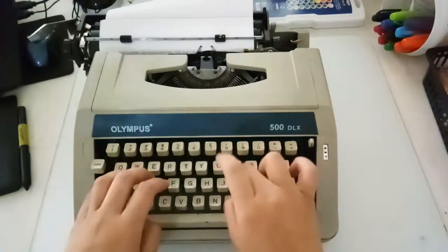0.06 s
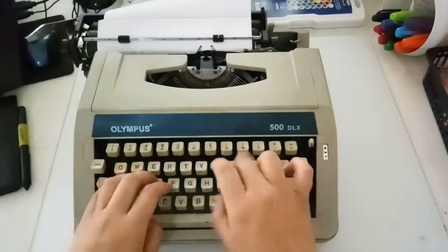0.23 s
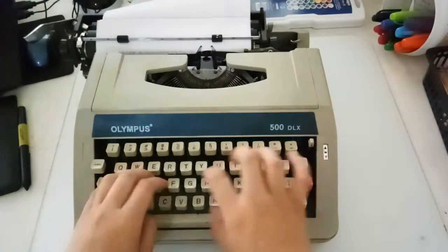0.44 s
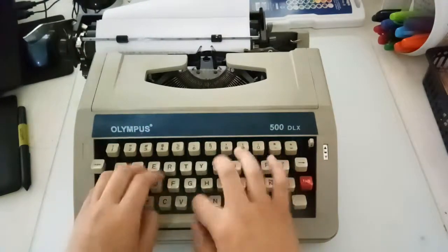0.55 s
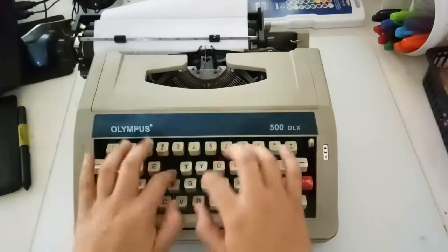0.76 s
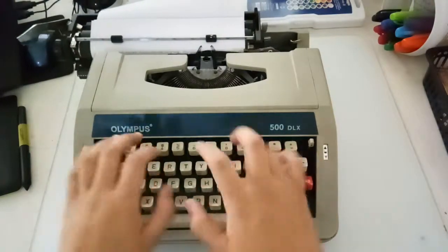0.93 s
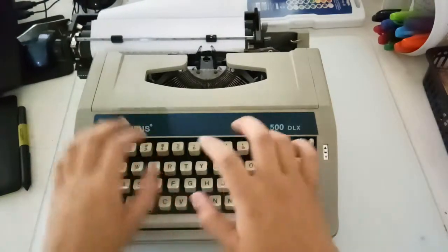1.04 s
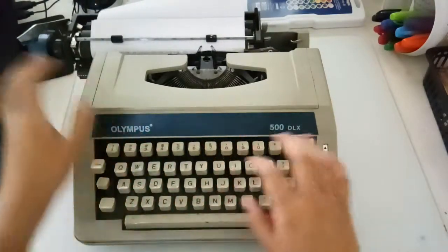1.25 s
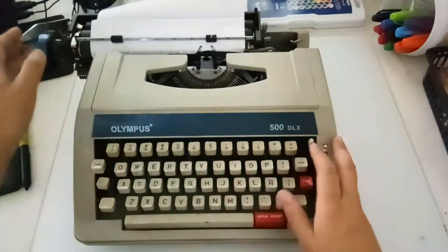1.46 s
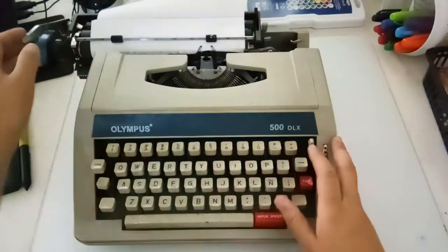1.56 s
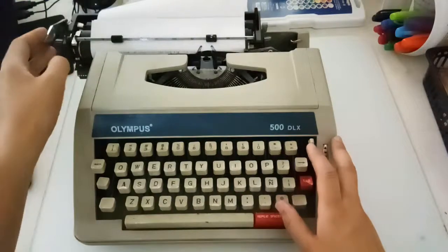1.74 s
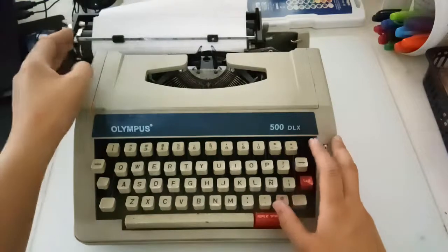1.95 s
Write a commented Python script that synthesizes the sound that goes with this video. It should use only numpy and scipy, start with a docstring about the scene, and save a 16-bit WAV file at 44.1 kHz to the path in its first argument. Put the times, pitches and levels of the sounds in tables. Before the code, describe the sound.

A typewriter clacks quickly, its bell dings, then the carriage lever clicks softly.

```python
"""Type bars slap the platen of a portable typewriter and rattle back, on a desk in a quiet room.
Each impact is a burst of noise plus the damped modes of the parts it excites. The margin bell rings
and beats; the typing stops, and a hand takes up the carriage lever with a few clicks.
A limiter flattens each blow and lets the bell swell back between them."""
import sys
import numpy as np
from scipy import signal
from scipy.fft import rfft, irfft
from scipy.io import wavfile

SR = 44100
rng = np.random.default_rng(int(sys.argv[2]) if len(sys.argv) > 2 else 0)


def persist_wave(psi):
    """Save psi, clipped to +-1, as 16-bit WAV."""
    counts = np.round(np.clip(psi, -1, 1) * 32767).astype(np.int16)
    wavfile.write(sys.argv[1], SR, np.atleast_2d(counts).T)


N = 88200
TIME = np.arange(N) / SR


def amp(db):
    """Amplitude ratio: a factor of ten for every 20 dB."""
    return np.exp(np.maximum(db, -300) * (np.log(10) / 20))


def gains(spectrum, hz):
    """Frequency response: levels interpolated on a log-frequency axis."""
    points_hz, db = np.transpose(spectrum)
    return amp(np.interp(np.log(hz + 1), np.log(points_hz), db))


def unit(x):
    """Normalisation to an rms of 1."""
    return x / np.sqrt(np.mean(x ** 2) + 1e-20)


def noise(spectrum, tilt_db=0):
    """Spectral shaping: white noise is coloured, then tilted by tilt_db per octave about 5 kHz."""
    hz = np.fft.rfftfreq(N, 1 / SR)
    tilt = amp(tilt_db * np.log2(np.maximum(hz, 500) / 5000))
    return unit(irfft(rfft(rng.standard_normal(N)) * gains(spectrum, hz) * tilt, N))


def fade(t60, hold_s=0):
    """Exponential decay: after the hold, the level falls 60 dB every t60 seconds."""
    return amp(-60 * np.maximum(TIME - hold_s, 0) / t60)


def rise(seconds):
    """Linear onset from silence to full amplitude."""
    return np.minimum(TIME / seconds, 1)


def sine(hz):
    """Simple harmonic motion with a random phase."""
    return np.sin(2 * np.pi * (hz * TIME + rng.random()))


def modes(table):
    """Free vibration: a sum of damped sinusoids."""
    return sum(amp(db) * sine(hz) * fade(t60) for hz, db, t60 in table)


def impact(spectrum, tilt_db, hold_s, rise_s, crack_t60, tail_db, tail_t60):
    """Two-stage decay: the crack of many small metal parts and their tail add in power."""
    envelope = np.hypot(fade(crack_t60, hold_s), amp(tail_db) * fade(tail_t60))
    return noise(spectrum, tilt_db) * envelope * rise(rise_s)


def add(mix, start_s, sound):
    """Superposition: a sound joins the mix at its start time."""
    at = round(start_s * SR)
    sound = sound[max(-at, 0):]
    part = mix[max(at, 0):][:len(sound)]
    part += sound[:len(part)]


def split(x, hz):
    """Complementary filtering: the bass below hz, and the rest."""
    bass = signal.sosfiltfilt(signal.butter(3, hz, fs=SR, output="sos"), x, padtype="even")
    return bass, x - bass


# Room noise. Each row: frequency in Hz, relative level in dB.
ROOM_SPECTRUM = [(25, -7), (42, -11), (75, 6.5), (135, 3), (210, -8), (700, -8.5), (1500, -12), (3200, -17),
                 (6300, -18.5), (8300, -28), (10000, -20.5), (15500, -40)]
# An appliance's hum. Each row: frequency in Hz, level in dB.
HUM_TONES = [(135, -63.5), (274.5, -67), (329, -69.5), (711, -70)]
# Drift of the background above the bass. Each row: time in seconds, gain in dB.
ROOM_DRIFT = [(0, 5.5), (1.0, -6.5), (1.17, -9.5), (1.27, -0.5), (1.42, 0), (1.58, 3.5), (1.75, 2.5),
              (2, 2.5)]

def room():
    """Ambient noise: a continuous low rumble under the line spectrum of a faint hum."""
    air = amp(-55) * noise(ROOM_SPECTRUM)
    hum = np.sqrt(2) * sum(amp(db) * sine(hz) for hz, db in HUM_TONES)
    bass, rest = split(air + hum, hz=190)
    return bass + rest * amp(np.interp(TIME, *np.transpose(ROOM_DRIFT)))


# Thuds of the case. Each row: start in seconds, level in dB.
CASE_THUDS = [(-.005, -55), (.315, -61), (0.441, -62.5), (.545, -55), (0.756, -63), (1.02, -54)]
# The desk's modes. Each row: frequency in Hz, level in dB, t60 in seconds.
DESK_RING = [(81.5, 1, 0.32), (135, 10, 0.3), (172, 4, 0.2)]

def desk():
    """Structure-borne sound: heavy keystrokes push the case into the desk and excite its low modes."""
    out = np.zeros(N)
    for start, db in CASE_THUDS:
        add(out, start, amp(db) * modes(DESK_RING) * rise(0.0087))
    return out


def frame(x, spread_db=2.5, spacing_hz=45):
    """Resonant filtering: the metal frame's dense, uneven modes act as a minimum-phase filter."""
    hz = np.fft.rfftfreq(2 * N, 1 / SR)
    peaks = np.interp(hz / spacing_hz, np.arange(N), rng.standard_normal(N))
    gain = unit(amp(spread_db * peaks))
    log_gain = np.log(np.r_[gain, gain[-2:0:-1]])
    response = np.exp(np.conj(signal.hilbert(log_gain)))
    return irfft(rfft(x, 2 * N) * response[:N + 1])[:N]


# Lever clicks. Each row: start in seconds, level in dB, tilt in dB per octave.
LEVER_CLICKS = [(1.707, -30.5, 0.5), (1.7206, -36, -3), (1.9104, -34, 0.5), (1.933, -35, 0)]
# A click's noise. Each row: frequency in Hz, relative level in dB.
CLICK_SPECTRUM = [(100, -36), (800, -1.5), (1500, -5.5), (3500, 2.5), (4600, 0.5), (5500, 5.5), (6500, 5.5),
                  (8300, -11), (9300, -5), (10900, -1), (12300, -13), (15500, -10.5)]
# The lever's modes. Each row: frequency in Hz, level in dB, t60 in seconds.
LEVER_RING = [(851.6, -14, .14), (2150, -16, 0.06), (3060, -17.5, 0.12), (3620, -17, .12),
              (5360, -14, 0.14), (6490, -21.5, 0.18)]

def carriage_lever():
    """Backlash: the lever and its pawl click and ring as they take up their slack."""
    out = np.zeros(N)
    for start, db, tilt in LEVER_CLICKS:
        click = impact(CLICK_SPECTRUM, tilt, hold_s=0.001, rise_s=0.00019,
                       crack_t60=0.031, tail_db=-13.5, tail_t60=0.43)
        add(out, start, amp(db) * (click + modes(LEVER_RING)))
    return out


# Keys, bars and escapement moving and falling back.
# Each row: start in seconds, level in dB, hold in seconds, tilt in dB per octave.
LINKAGE_RATTLES = [(.027, -32, 0.0032, -2.5), (0.065, -25, 0.0073, 1), (.191, -35.5, 0.0044, 0),
                   (0.207, -26, 0.0044, 0), (0.308, -35, 0.0025, -4), (0.332, -22, 0.009, 2.5),
                   (0.426, -36, 0.0047, -5), (0.4342, -27, 0.015, -2), (0.4593, -11.5, 0.0016, -0.5),
                   (.6355, -12, 0.0063, 3), (0.663, -22, 0.0027, -1), (0.737, -31.5, 0.0042, -4),
                   (0.7833, -14, .004, 4), (.794, -26.5, 0.0013, -3), (.825, -20, 0.0034, 4),
                   (0.913, -19, .01, 12), (1.009, -27.5, 0.005, -1.5), (1.043, -30, .004, 0.5),
                   (1.051, -26.5, 0.0086, -1)]
# A rattle's noise. Each row: frequency in Hz, relative level in dB.
RATTLE_SPECTRUM = [(100, -19), (500, -16), (1500, -11), (2600, -5.5), (4200, 1), (6400, 2), (8200, -4),
                   (9800, 1.5), (11700, -4), (13500, -9), (15500, 3)]
# Faint modes of frame and springs. Each row: frequency in Hz, level in dB, t60 in seconds.
FRAME_RING = [(1860, -43, 2.75), (2353, -26, 0.24), (2543, -27, 0.41), (8000, -32, 0.22), (9530, -33, .45),
              (11950, -15, 0.2)]

def linkage(grain_db=3.0, grain_s=0.0012):
    """Intermittent contact: loose levers chatter in uneven grains and set frame and springs ringing."""
    out, ring = np.zeros(N), modes(FRAME_RING)
    for start, db, hold, tilt in LINKAGE_RATTLES:
        grains = np.interp(TIME / grain_s, np.arange(N), rng.standard_normal(N))
        chatter = amp(grain_db * grains * fade(0.2, hold))
        rattle = impact(RATTLE_SPECTRUM, tilt, hold, rise_s=0.61 * hold,
                        crack_t60=0.04, tail_db=-9, tail_t60=0.54)
        add(out, start, amp(db) * (chatter * rattle + ring))
    return out


# Keys bottoming. Each row: start in seconds, level in dB.
KEY_KNOCKS = [(.085, -43.5), (.442, -34.5), (0.551, -39), (0.576, -50.5), (0.75, -45.5), (0.863, -37.5),
              (.897, -40)]
# A knock's noise. Each row: frequency in Hz, relative level in dB.
KNOCK_SPECTRUM = [(60, -2), (250, -8), (550, 6), (1000, -2.5), (2000, -8), (6000, -17)]

def keys():
    """Blunt impact: keys bottom in the frame with a slow onset and little treble."""
    out = np.zeros(N)
    for start, db in KEY_KNOCKS:
        knock = impact(KNOCK_SPECTRUM, 0, hold_s=0.0044, rise_s=0.013,
                       crack_t60=0.094, tail_db=-8.5, tail_t60=0.32)
        add(out, start, amp(db) * knock)
    return out


# The bell's low, middle and top partials. Each entry: frequency in Hz.
PARTIAL_HZ = [4113, 9425, 15392]
# Their decays, in that order. Each row: level in dB, t60 in seconds.
PARTIAL_DECAYS = [(-34, 3.91), (-14.5, 1.8), (-14.5, 0.91)]
# The low partial's close twin. Each row: scene time in seconds, level relative to that partial in dB.
TWIN_CURVE = [(.46, -8), (1.0, -6.5), (1.14, -2), (1.23, -5.5), (1.46, -2.5), (1.54, -6), (2, -12)]
# Wavering of the middle and top partials. Each row: scene time in seconds, gain in dB.
MIDDLE_CURVE = [(.46, 3), (.62, -1), (.8, -9), (.9, 1.5), (1.08, 7.5), (1.212, 7), (1.249, -18.5),
                (1.278, 6), (1.34, 4.5), (1.385, -6), (1.42, 5.5), (1.455, -15.5), (1.5, 0), (1.6, 1),
                (2, 3.5)]
TOP_CURVE = [(.46, 3.5), (.495, 4.5), (0.522, -13), (0.535, 1.5), (.565, -3), (.597, -5), (.63, 9.5),
             (.7, -2), (.77, 6.5), (.82, -5), (1.1, 0), (1.17, -7), (1.22, 1), (1.28, -8), (1.32, 5),
             (1.45, 4)]

def bell(start_s=0.458, beat_hz=13.1, beat_null_s=1.228):
    """Beating: a small steel cup's low partial interferes with a close twin; the upper two waver."""
    clock = TIME + start_s
    twin, middle, top = (amp(np.interp(clock, *np.transpose(curve)))
                         for curve in (TWIN_CURVE, MIDDLE_CURVE, TOP_CURVE))
    beat = 1 - twin * np.exp(-2j * np.pi * beat_hz * (clock - beat_null_s))
    ring = amp(-10.5) * sine(hz=14780) * fade(t60=0.049)  # the clapper's short ping
    for hz, (db, t60), waver in zip(PARTIAL_HZ, PARTIAL_DECAYS, (beat, middle, top)):
        partial = (waver * np.exp(2j * np.pi * hz * TIME)).imag
        ring += amp(db) * fade(t60) * partial
    out = np.zeros(N)
    add(out, start_s, ring * rise(0.002))
    return out


# Type bars hitting the platen. Each row: start in seconds, level in dB.
BAR_STRIKES = [(-.045, -10.5), (0.2165, -9.5), (0.6854, -9), (0.8308, -8), (.9492, -10.5)]
# A strike's broad crack. Each row: frequency in Hz, relative level in dB.
CRACK_SPECTRUM = [(100, -46), (400, -16), (1400, -16), (2400, -9.5), (4200, -6.5), (5400, 3.5), (6400, 2.5),
                  (7200, -8.5), (8400, -12), (10000, -3), (13000, -17), (15500, -15)]
# The slug's snap. Each row: frequency in Hz, level in dB, t60 in seconds.
SNAP_MODES = [(6310, 2, 0.024), (5660, -6.5, 0.042)]
# The type basket's modes. Each row: frequency in Hz, relative level in dB.
BASKET_MODES = [(4893, -53), (4963, -54), (5313, -41), (5356, -46), (5399, -59), (5593, -46), (5873, -69),
                (5949, -73), (6072, -40), (6374, -66)]

def type_bars():
    """Impulse excitation: each slug snaps on the platen and sets the basket of bars ringing."""
    out = np.zeros(N)
    for start, db in BAR_STRIKES:
        crack = impact(CRACK_SPECTRUM, 0, hold_s=0.00051, rise_s=0.00084,
                       crack_t60=0.024, tail_db=-5.5, tail_t60=0.41)
        basket = unit(sum(amp(level) * sine(hz) for hz, level in BASKET_MODES))
        strike = amp(-6.5) * crack + modes(SNAP_MODES) + amp(-24) * basket * fade(t60=0.53)
        add(out, start, amp(db) * strike)
    return out


def scene():
    """Superposition: the pressures of all sources add at one microphone."""
    mechanism = frame(linkage() + keys() + carriage_lever())
    mono = mechanism + type_bars() + desk() + bell() + room()
    return np.array([mono, mono])


def limiter(x, threshold_db=-24, slope=0.88, sense_s=0.003, lag_s=0.00046, recover_db_per_s=135.5):
    """Gain compression: power above the threshold turns the gain down, slightly late."""
    keep = np.exp(-1 / (sense_s * SR))
    power_db = 10 * np.log10(signal.lfilter([1 - keep], [1, -keep], x ** 2) + 1e-12)
    fall_db = recover_db_per_s * TIME
    peak_db = np.maximum.accumulate(power_db + fall_db) - fall_db  # sinks steadily after each peak
    over_db = np.maximum(peak_db - threshold_db, 0)
    late_db = np.interp(np.maximum(TIME - lag_s, 2 * sense_s), TIME, over_db)
    return x * amp(-slope * late_db)


# The microphone's treble lift. Each row: frequency in Hz, gain in dB.
MIC_RESPONSE = [(20, 0), (13700, 0), (14750, 10), (15400, 9)]

def record(dry, edge_hz=15500):
    """Peak limiting above the bass and clipping of what slips past, then a treble lift and low-pass."""
    bass, rest = split(dry[0], hz=147)
    clipped = np.clip(bass + limiter(rest), -0.4, 0.4)
    lift = gains(MIC_RESPONSE, np.fft.rfftfreq(2 * N, 1 / SR))
    bright = irfft(rfft(clipped, 2 * N) * lift)[:N]
    lowpass = signal.firwin(801, edge_hz, window=("kaiser", 9), fs=SR)
    out = signal.oaconvolve(bright, lowpass, "same")
    return np.array([out, out])


dry = scene()
out = record(dry)
persist_wave(out)
```